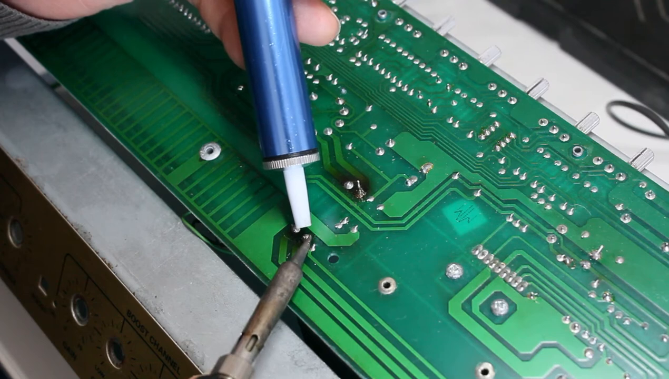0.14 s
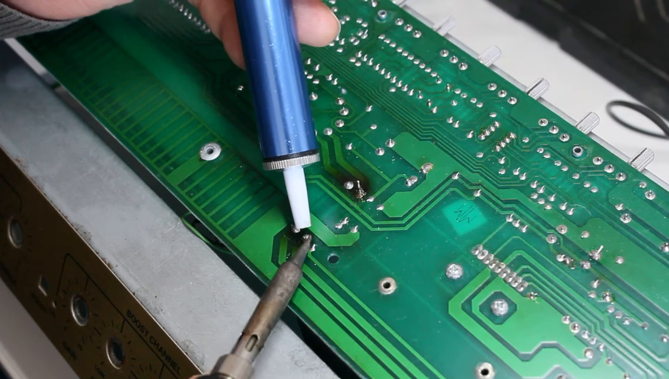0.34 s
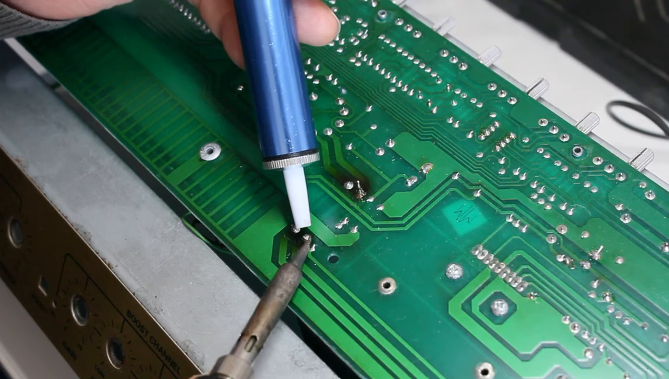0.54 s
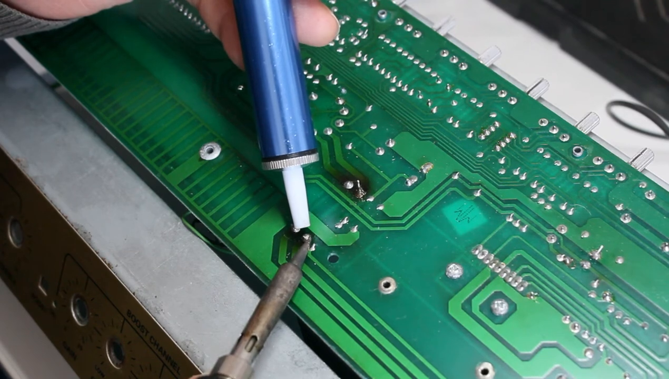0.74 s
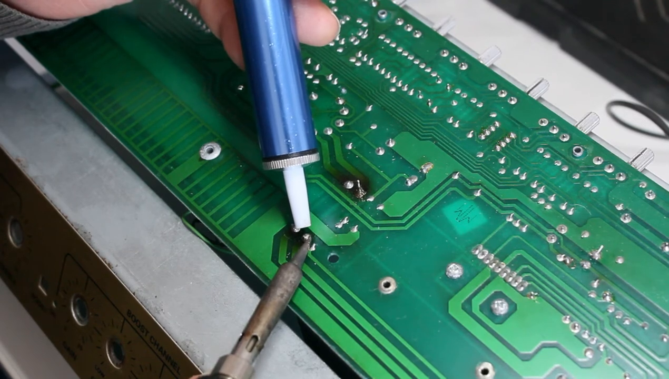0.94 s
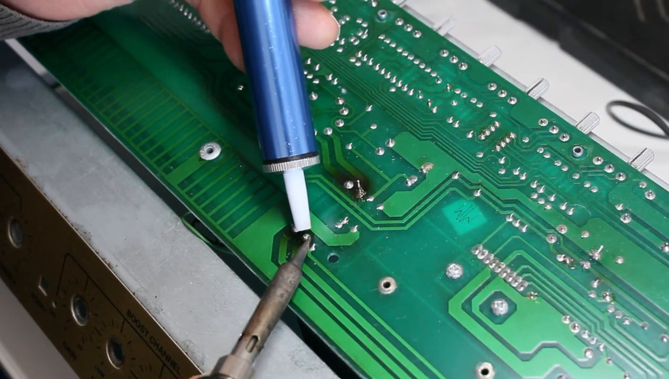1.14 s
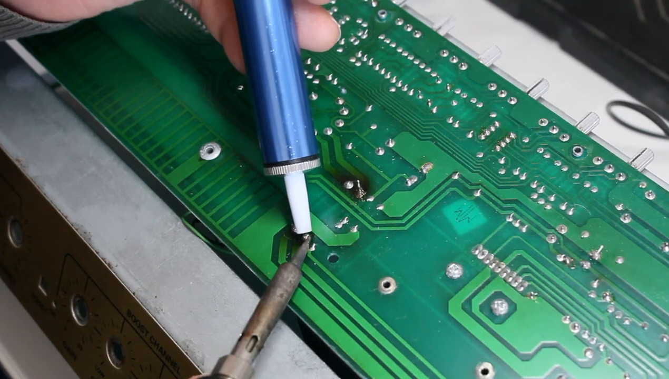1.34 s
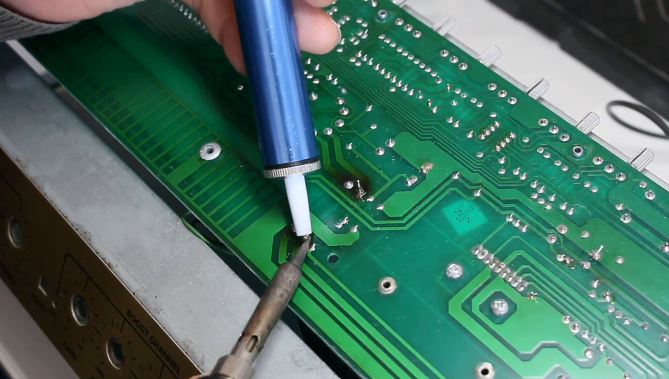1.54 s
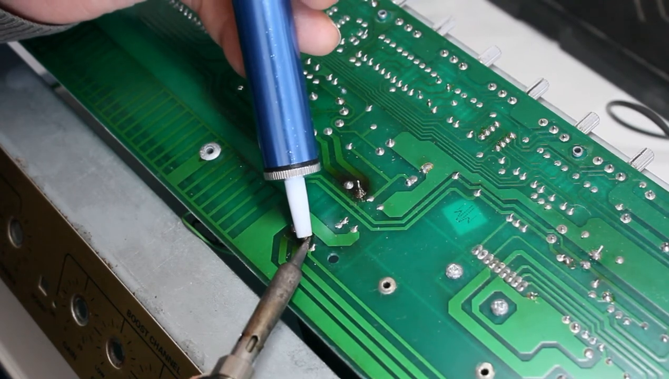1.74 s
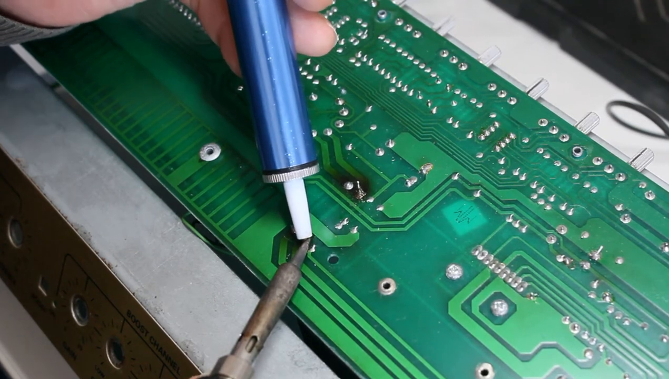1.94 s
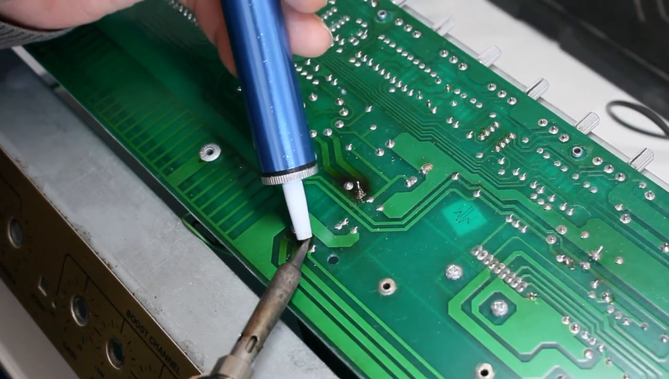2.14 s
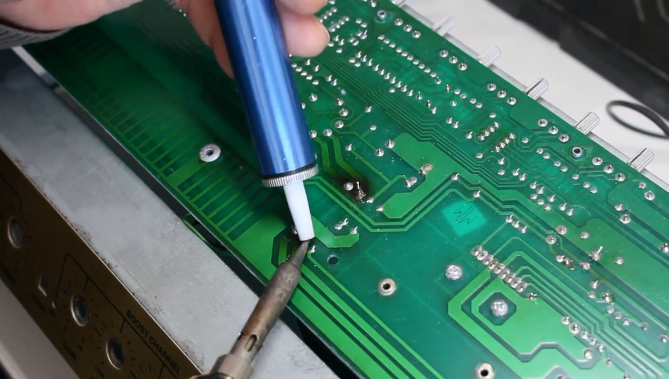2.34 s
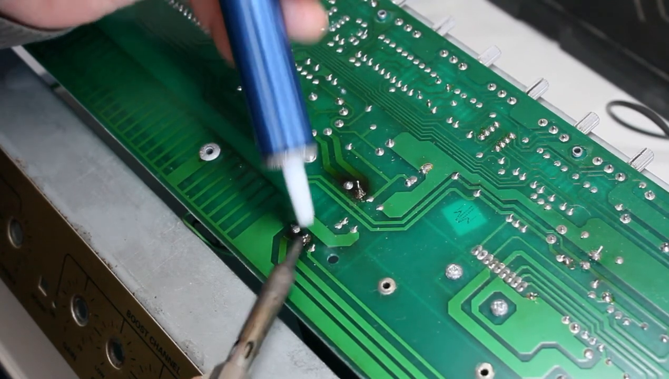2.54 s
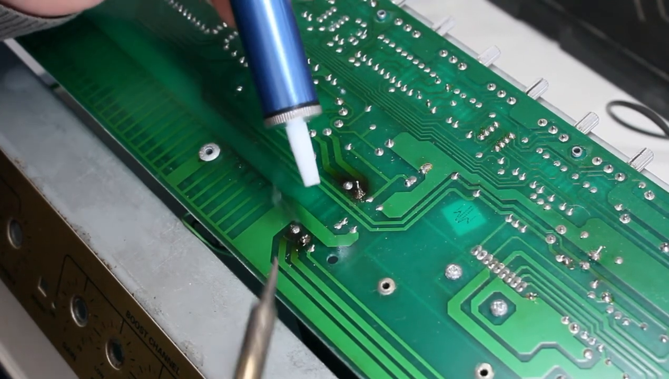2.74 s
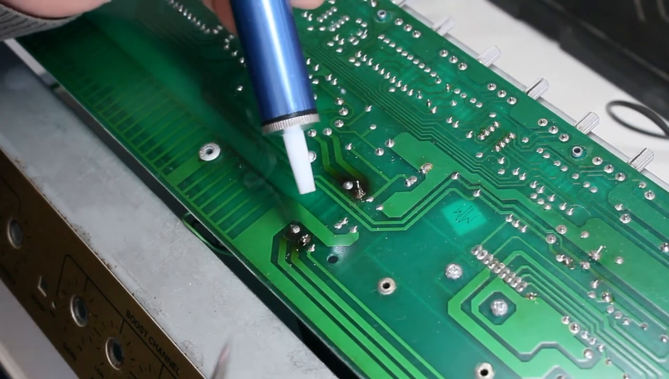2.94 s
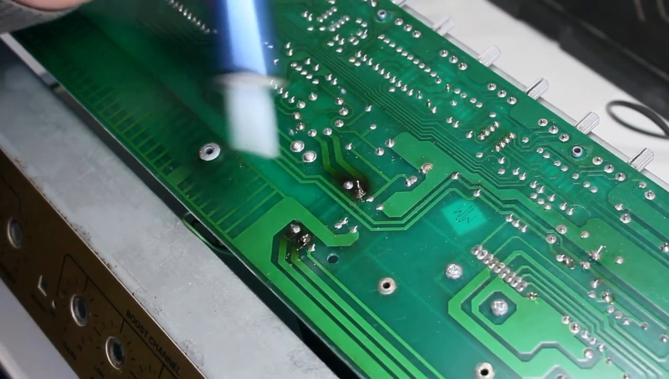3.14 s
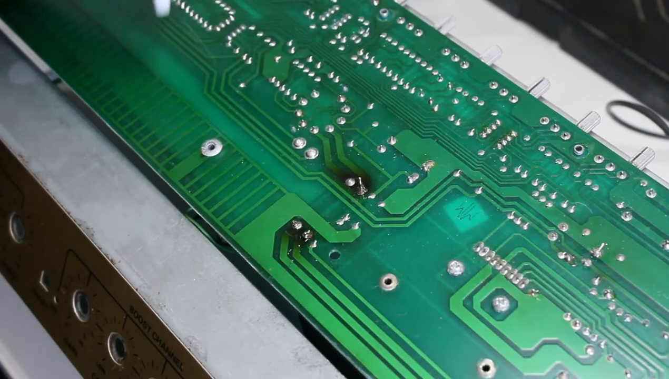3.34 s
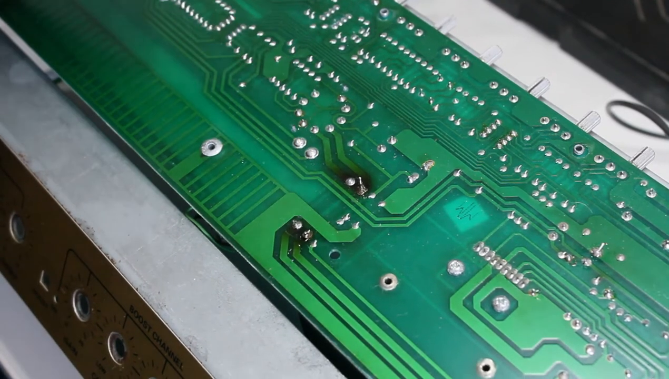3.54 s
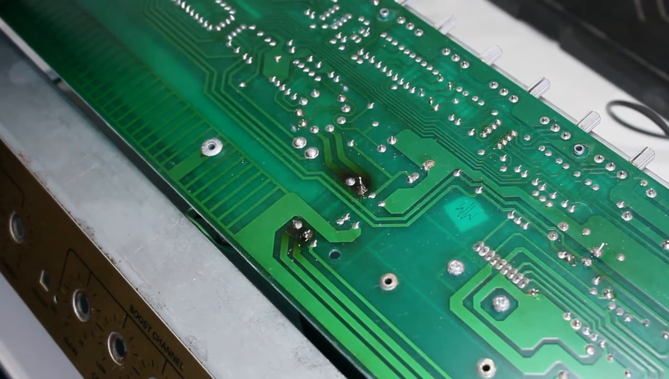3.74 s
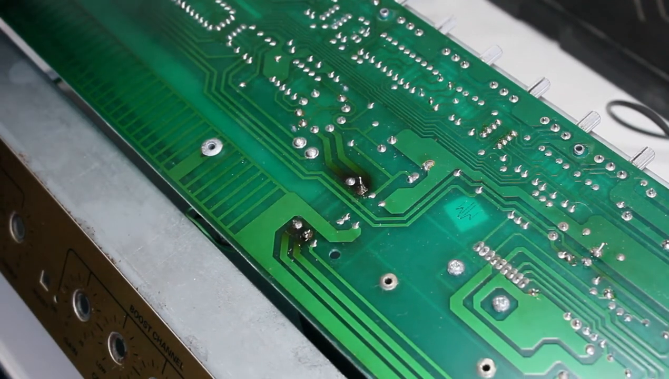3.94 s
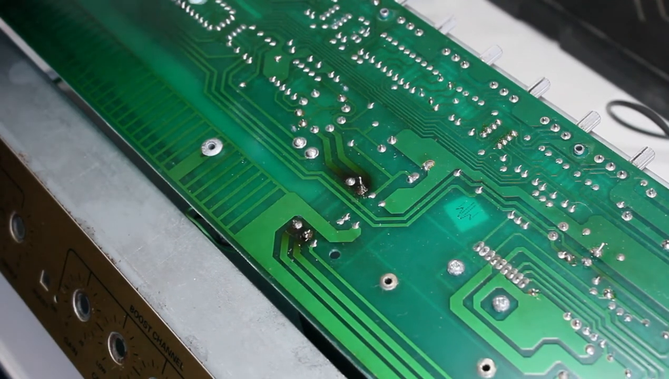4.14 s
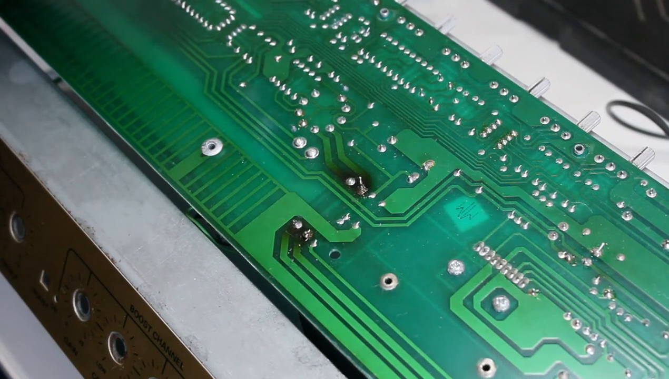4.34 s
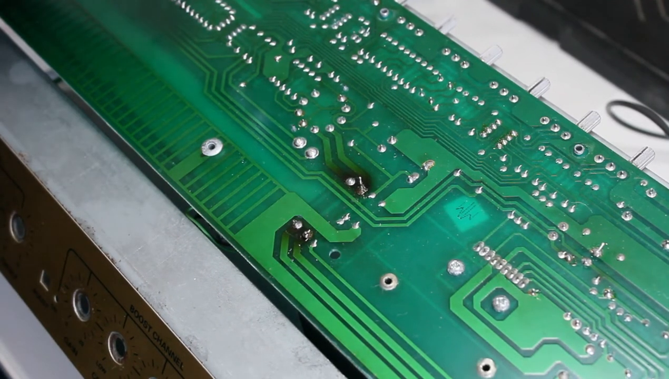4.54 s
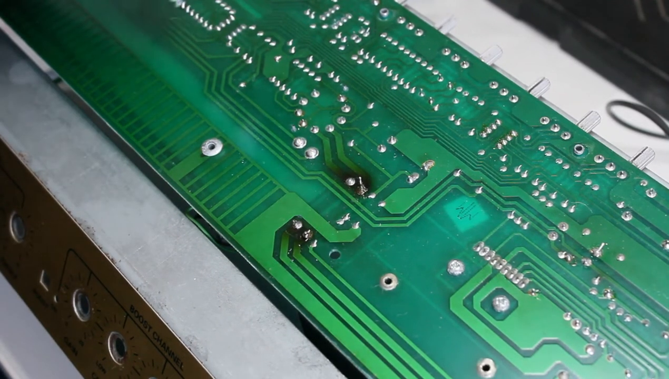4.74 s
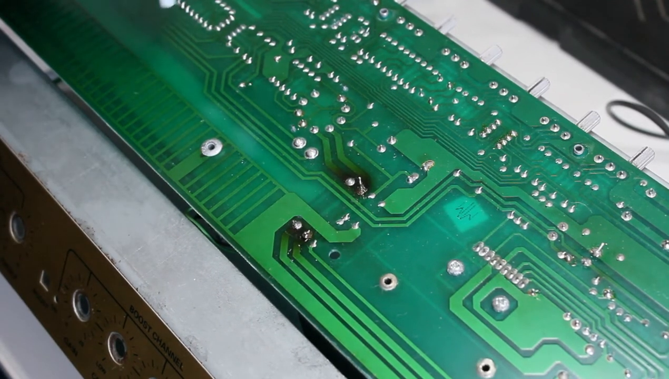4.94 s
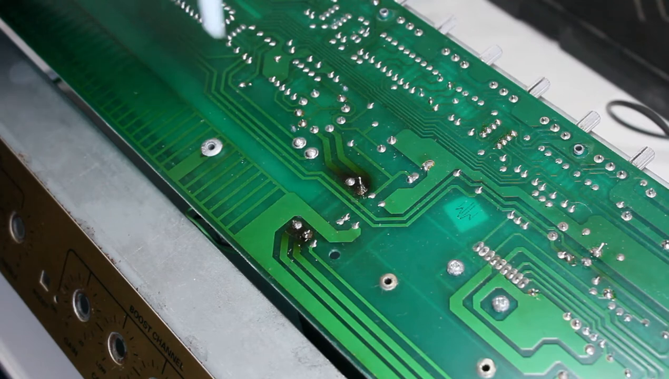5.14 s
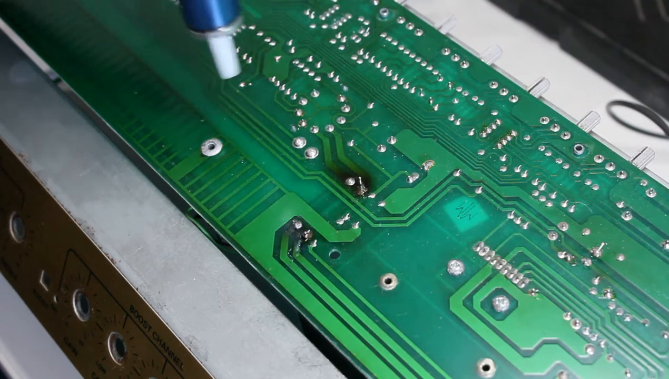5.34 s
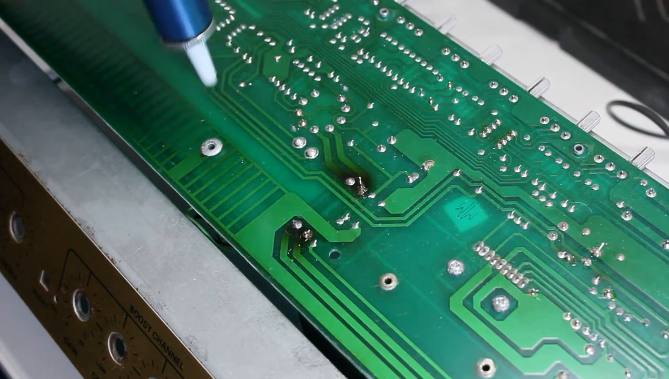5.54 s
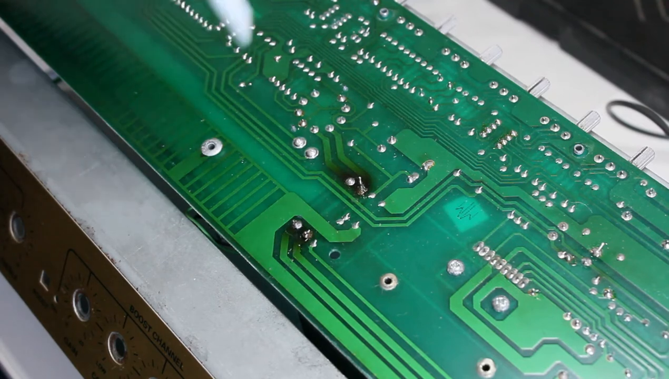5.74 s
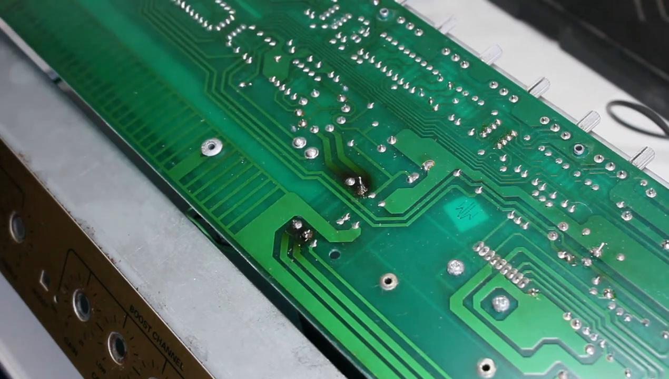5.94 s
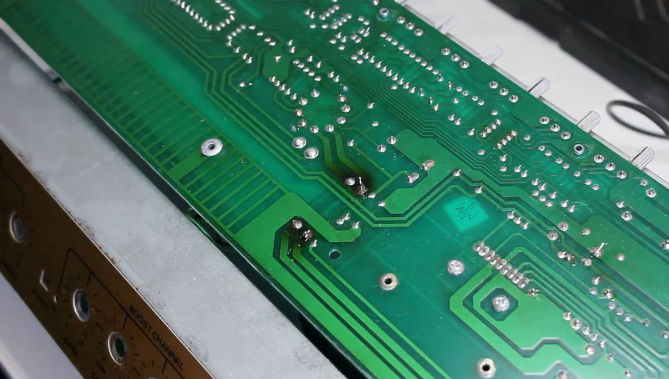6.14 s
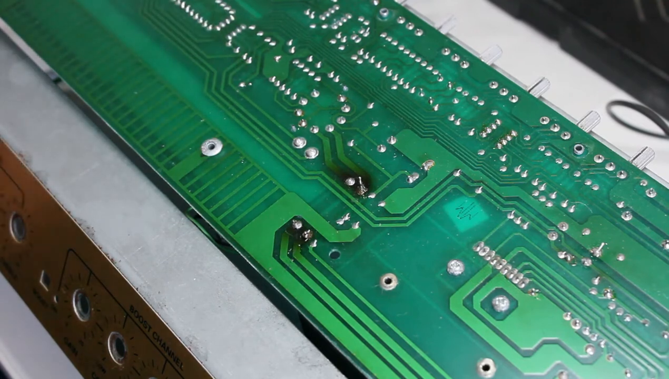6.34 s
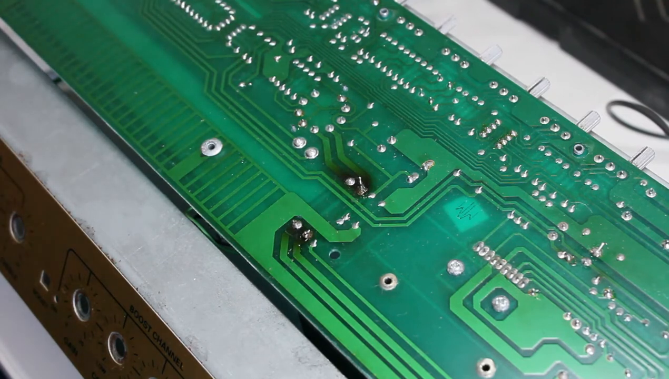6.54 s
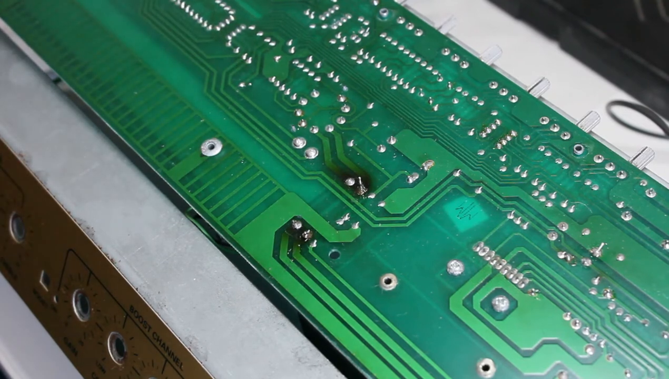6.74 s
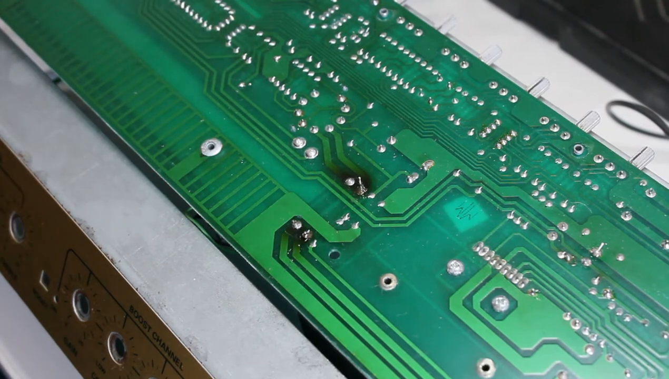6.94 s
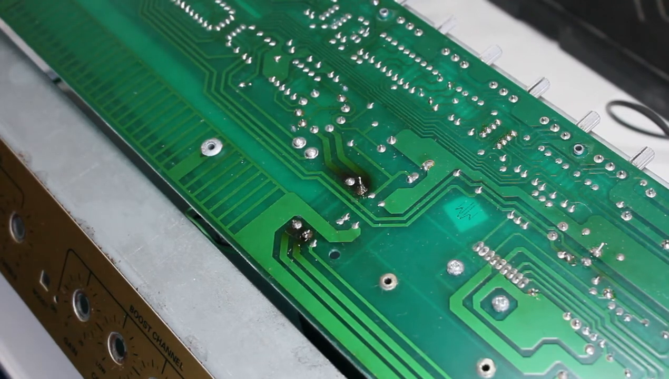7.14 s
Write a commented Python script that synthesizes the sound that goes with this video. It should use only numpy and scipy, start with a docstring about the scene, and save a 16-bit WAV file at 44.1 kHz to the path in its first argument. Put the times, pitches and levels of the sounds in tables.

```python
"""A spring-loaded desoldering pump fires at a circuit board, then its plunger is pushed home, latched and worked again.
The shot is a gulp of shaped noise and a piston slamming down a ringing barrel, built from noise cracks and decaying modes.
Tools tap the board, strokes rub, and the soldering iron is wiped with a noise hiss and knocks into its stand.
The place is a small workroom with faint hum and whines, heard through a close microphone with gain control."""
import sys
import numpy as np
from scipy import signal
from scipy.fft import rfft, irfft
from scipy.io import wavfile
from scipy.ndimage import uniform_filter1d

SR = 44100
rng = np.random.default_rng(int(sys.argv[2]) if len(sys.argv) > 2 else 0)


def file_out(sig):
    """Save sig as 16-bit WAV at sys.argv[1]."""
    # one column per channel
    cols = np.atleast_2d(sig).T
    # limit, then scale
    lim = np.clip(cols, -1, 1)
    pcm = np.round(lim * 32767).astype(np.int16)
    wavfile.write(sys.argv[1], SR, pcm)


N = 321048  # length in samples
T = np.arange(N) / SR  # time in seconds


def from_db(db):
    """Decibels to an amplitude factor."""
    return 10 ** (np.asarray(db) / 20)


def rms_one(x):
    """Scale to an rms of 1."""
    return x / np.sqrt(np.mean(x ** 2) + 1e-20)


def unit_energy(x):
    """Scale so that the squared samples sum to 1."""
    return x / np.sqrt(np.sum(x ** 2) + 1e-20)


def level(start, attack, hold, release):
    """Gain over time: a straight rise to 1, a hold and a straight fall; all arguments in seconds."""
    corners = start + np.cumsum([0, attack, hold, release])
    return np.interp(T, corners, [0, 1, 1, 0])


def band(x, low_hz, high_hz, order=3):
    """Keep only one band of frequencies."""
    top_hz = min(max(high_hz, low_hz * 1.1), SR * .45)
    return signal.sosfilt(signal.butter(order, [low_hz, top_hz], "band", fs=SR, output="sos"), x)


def coloured(spectrum):
    """Noise with a smooth (freq_hz, level_db) spectrum; rms 1."""
    hz, db = np.transpose(spectrum)
    bins_hz = np.maximum(np.arange(N // 2 + 1) * SR / N, 1)
    gain = from_db(np.interp(np.log(bins_hz), np.log(hz), db))
    return rms_one(irfft(rfft(rng.standard_normal(N)) * gain, N))


def dying(t, t60):
    """Exponential decay that falls 60 dB in t60 seconds."""
    return np.exp(-np.log(1000) * t / t60)


def add(out, s, sound):
    """Mix a sound in from time s."""
    at = int(s * SR)
    out[at:at + len(sound)] += sound[:N - at]


SNAP_HZ = (5800, 10500)  # low and high edge of a blow's bright part
THUD_REF_HZ, THUD_DB_PER_OCTAVE = 3210, 10.5  # blows pitched below this carry more thud, above it less


def blows(rows, modes, ring_db, thud_db, thud_hz, width, contact_ms, scatter_db=1.0):
    """Each blow is a brief noisy contact with thud, pitched knock and snap; the body's modes ring after it."""
    out, t = np.zeros(N), T[:SR // 3]
    contact = np.exp(-(t[:SR // 25] * 1000 / contact_ms) ** 1.5)
    for s, db, pitch_hz, snap_db in rows:
        bands_hz = np.array([thud_hz, (pitch_hz / width, pitch_hz * width), SNAP_HZ])
        pitch_thud_db = THUD_DB_PER_OCTAVE * np.log2(THUD_REF_HZ / pitch_hz)
        bands_db = db + np.array([thud_db + pitch_thud_db, 0, snap_db])
        for (low, high), band_db in zip(bands_hz, bands_db):
            crack = unit_energy(band(rng.standard_normal(len(contact)) * contact, low, high, order=2))
            add(out, s, crack * from_db(band_db) * np.sqrt(SR / 200))  # levels are rms over 5 ms
        # each mode is driven by the blow's strength near its own frequency
        centres = np.log(bands_hz).mean(axis=1)
        for hz, mode_db, t60 in modes:
            drive_db = np.interp(np.log(hz), centres, bands_db) + ring_db + scatter_db * rng.standard_normal()
            add(out, s, from_db(drive_db + mode_db) * dying(t, t60) * np.cos(2 * np.pi * hz * t))
    return out


# room and microphone noise spectrum: freq_hz, level_db
HUSH_SPECTRUM = [(15, -54.5), (25, -8.5), (141, -4), (344, -6), (677, -8.5), (3920, -16), (5430, -19),
                 (6740, -22.5), (7310, -19.5), (12900, -33), (16000, -51)]
HUSH_DB = -54
# faint hum and thin whines: centre_hz, width_hz, level_db
WHINE_BANDS = [(145, 25, -68.5), (5200, 120, -72.5), (7424, 200, -78), (12790, 147.6, -83.5)]


def hush():
    """Steady room noise and hiss, with narrow bands of noise for the hum and whines."""
    out = from_db(HUSH_DB) * coloured(HUSH_SPECTRUM)
    for hz, width_hz, db in WHINE_BANDS:
        whine = band(rng.standard_normal(N), hz - width_hz / 2, hz + width_hz / 2, order=1)
        out += from_db(db) * rms_one(whine)
    return out


# tool tips touching the board: start_s, level_db, pitch_hz, snap_db (relative to level_db)
TOOL_TAPS = [(0.581, -48.5, 1110, -21), (0.5958, -32.5, 1900, -41), (1.2573, -43, 1795, -3.5),
             (2.578, -39, 2170, -22), (2.5924, -35, 2880, -12), (2.7879, -50, 1500, -29),
             (5.7145, -56, 900, -16), (6.7601, -45.5, 2367, -18)]
# what the circuit board rings with: freq_hz, level_db, t60_s
BOARD_MODES = [(430, -13, .22), (505, -14, .17), (1604, -12, .15)]


def board_taps():
    """Light contacts of a tool tip set the board's low modes ringing."""
    return blows(TOOL_TAPS, BOARD_MODES, ring_db=2.5, thud_db=-10.0, thud_hz=(400, 1150),
                 width=1.63, contact_ms=3.2)


def grains(per_s, spread_db):
    """Tiny slips of very uneven size, at random moments; rms 1."""
    sizes = from_db(spread_db * np.minimum(rng.exponential(1, N), 4))
    happens = rng.random(N) < per_s / SR
    return rms_one(happens * sizes * rng.standard_normal(N))


# plunger sliding, tools and fingers rubbing, hands on the bench: peak_s, length_s, level_db, centre_hz
RUB_STROKES = [(2.577, 0.044, -47, 1700), (2.9, 2.43, -55.5, 123.3), (3.4, 0.81, -53.5, 698),
               (3.427, 0.67, -58.5, 6000), (3.95, 0.037, -42, 12000), (4.2, 0.65, -51.5, 2220),
               (4.3125, 0.012, -24.5, 9900), (4.573, .15, -39.5, 5750), (4.69, 0.22, -37.5, 3400),
               (4.961, 0.026, -22, 3950), (4.975, 0.048, -35, 11000), (5.273, 0.074, -46, 2200),
               (5.884, 0.027, -49, 3500), (5.926, 0.074, -42.5, 1820), (7.245, 0.13, -47.5, 150)]
RUB_RISE_SHARE, RUB_WIDTH = 0.48, 1.76  # part of a stroke spent swelling; band edge over centre


def rubs():
    """Dry friction: dense slips that swell and fade with each stroke."""
    out, slips = np.zeros(N), grains(per_s=29000, spread_db=4.5)
    for peak, length, db, hz in RUB_STROKES:
        rise = length * RUB_RISE_SHARE
        stroke = level(peak - rise, rise, 0, length - rise)
        out += from_db(db) * stroke * rms_one(band(slips, hz / RUB_WIDTH, hz * RUB_WIDTH, order=1))
    return out


# clacks of catch and plunger: start_s, level_db, pitch_hz, snap_db (relative to level_db)
CATCH_CLACKS = [(2.2973, -36.5, 3530, -12.5), (3.2911, -50, 3460, 6.5), (3.6288, -29, 3400, -12.5),
                (3.6876, -35, 3000, 6.5), (3.6969, -11, 3580, -1.5), (3.7642, -30, 3400, -4.5),
                (3.8426, -38.5, 3530, -14), (4.1214, -27.5, 3800, -6.5), (4.168, -17, 3600, 1),
                (4.2327, -27.5, 2470, 4.5), (4.235, -24, 3300, 10.5), (4.3132, -19.5, 4250, -3.5),
                (4.482, -32, 3240, 2.5), (4.6746, -29.5, 2200, -6), (4.698, -17.5, 2920, -20.5),
                (4.7261, -9, 3100, -3.5), (4.9611, -14.5, 2820, -16.5), (4.9643, -25, 1420, -6),
                (5.0285, -56, 2700, 11.5), (5.8171, -49, 4620, 6)]
# what the plunger rings with: freq_hz, level_db, t60_s
PLUNGER_MODES = [(2735, -11, .22), (3480, -17, .17), (3900, -17, .18), (6560, -20, .13), (7950, -21, .14)]
# low thumps under two heavy clacks, as overloaded peaks give: start_s, peak_db
LOW_THUMPS = [(3.6971, -18), (4.9634, -19)]
THUMP_HZ = (90, 795)  # low and high edge
# the catch drops back once after each clack, never louder than the maximum
REBOUND_S, REBOUND_LOSS_DB, REBOUND_MAX_DB = .0157, 11.5, -37.5
# each clack shakes the coil around the clack's pitch, but no lower than the lowest; width is band edge over centre
BUZZ_DB, BUZZ_T60_S, BUZZ_WIDTH, COIL_LOWEST_HZ = -21, 0.27, 1.4, 2730
# the plunger judders near the end of its stroke, the slips growing unevenly; growth is dB per slip
JUDDER_START_S, JUDDER_PERIOD_S, JUDDER_SLIPS = 4.6258, .0098, 5
JUDDER_DB, JUDDER_GROWTH_DB, JUDDER_SCATTER_DB = -39, 0.4, 3
JUDDER_HZ, JUDDER_SNAP_DB = 2450, -7


def plunger():
    """Clacks, each with a small rebound and a buzz of the coil; a run of juddering slips; two low thumps."""
    rebounds = [(s + REBOUND_S, min(db - REBOUND_LOSS_DB, REBOUND_MAX_DB), hz, min(snap_db, 0))
                for s, db, hz, snap_db in CATCH_CLACKS]
    slips = []
    for k, uneven_db in enumerate(JUDDER_SCATTER_DB * rng.standard_normal(JUDDER_SLIPS)):
        slip_db = JUDDER_DB + k * JUDDER_GROWTH_DB + uneven_db
        slips.append((JUDDER_START_S + k * JUDDER_PERIOD_S, slip_db, JUDDER_HZ, JUDDER_SNAP_DB))
    out = blows(CATCH_CLACKS + rebounds + slips, PLUNGER_MODES, ring_db=-9.5, thud_db=-17.5,
                thud_hz=(620, 2000), width=1.244, contact_ms=1.5)
    t = T[:SR // 3]
    for s, db, hz, _ in CATCH_CLACKS:
        coil_hz = max(hz, COIL_LOWEST_HZ)
        buzz = rms_one(band(rng.standard_normal(len(t)), coil_hz / BUZZ_WIDTH, coil_hz * BUZZ_WIDTH, order=2))
        add(out, s, from_db(db + BUZZ_DB) * dying(t, BUZZ_T60_S) * buzz)
    thump = band(signal.unit_impulse(len(t)), *THUMP_HZ, order=2)
    for s, db in LOW_THUMPS:
        add(out, s, from_db(db) * thump / thump.max())
    return out


# air gulped through the nozzle: start_s, attack_s, hold_s, release_s
SUCTION_TIMES = (2.3062, .004, .022, .008)
SUCTION_DB = -15.5
# colour of the rushing air: freq_hz, level_db
GULP_SPECTRUM = [(25, -25.5), (150, -0.5), (400, 2), (800, 1), (1400, 1), (3000, -4), (5200, 5.5),
                 (8000, -8), (10500, 1.5), (13000, -7.5)]
PIPE_HZ, PIPE_DB, PIPE_T60_S = 800, -16.5, .04  # the swing of the air in the barrel


def suction():
    """Air rushes in while the piston flies; its first jerk sets the air in the barrel swinging."""
    air = from_db(SUCTION_DB) * level(*SUCTION_TIMES) * coloured(GULP_SPECTRUM)
    t = T[:SR // 10]
    swing = -from_db(PIPE_DB) * np.sin(2 * np.pi * PIPE_HZ * t) * dying(t, PIPE_T60_S)
    add(air, SUCTION_TIMES[0], swing)
    return air


# the piston slamming down the barrel: start_s, level_db, pitch_hz, snap_db (relative to level_db)
SLAM_BLOWS = [(2.3102, -20.5, 3400, 6), (2.3219, -12, 1900, -14.5), (2.3225, -14.5, 3200, 8),
              (2.3338, -14.5, 4500, -6.5)]
# what the metal barrel rings with: freq_hz, level_db, t60_s
BARREL_MODES = [(2380, -23, .3), (4640, -20, .2), (5136, -20, .17), (5240, -19, .17), (6589, -4, .085),
                (6690, -15, .16), (10120, -21, .13), (10255, -21, .13)]


def piston_slams():
    """The piston strikes in quick succession and the metal barrel rings."""
    return blows(SLAM_BLOWS, BARREL_MODES, ring_db=-0.5, thud_db=-11.0, thud_hz=(150, 1700),
                 width=1.35, contact_ms=1.4)


# the slack spring chatters after the shot and again as the pump lifts off: start_s, length_s, level_db
CHATTER_SPELLS = [(2.36, 0.13, -51), (2.576, 0.125, -50)]
CHATTER_FADE_DB_PER_S = 45


def spring(per_s=60, low_hz=3600, high_hz=9500, edge_s=0.017):
    """The slack spring chatters against the barrel: decaying noise ticks at a wandering rate."""
    wander_db = 5.3 * rms_one(band(rng.standard_normal(N), 10, 36, order=1))
    turns = np.cumsum(per_s * from_db(wander_db)) / SR
    ticks = np.exp(-(turns % 1) / 0.18) * rng.standard_normal(N)
    shaking = np.zeros(N)
    for s, length, db in CHATTER_SPELLS:
        fading_db = db - CHATTER_FADE_DB_PER_S * np.maximum(T - s, 0)
        shaking += level(s, edge_s, length, edge_s) * from_db(fading_db)
    return shaking * rms_one(band(ticks, low_hz, high_hz))


# the hot tip on a damp sponge: peak_s, rise_s, fall_s, level_db
SPONGE_WIPES = [(6.96, 0.27, 0.11, -43.5), (7.26, 0.16, .3, -50)]
# colour of the steam: freq_hz, level_db
SIZZLE_SPECTRUM = [(300, -9.5), (1000, -13), (2500, -2), (4000, -1.5), (7000, -5.5), (10500, -7),
                   (13000, -11.5), (16000, -13)]
# the iron bouncing into its stand: start_s, level_db
STAND_BOUNCES = [(6.961, -30.5), (6.9635, -27.5), (6.9707, -24)]
STAND_PITCH_HZ, STAND_SNAP_DB = 1720, -26
# what the stand rings with: freq_hz, level_db, t60_s
STAND_MODES = [(355, -5, .16), (600, -10, .18), (1100, -2, .09), (1184, 3, .24), (1725, -3, .17),
               (1809, -6, .15), (2925, -8, .18), (3260, -4, .06)]


def iron(swell_power=1.5):
    """Steam hisses from the tip as shaped noise, and the shaft bounces into its ringing stand."""
    steam = np.zeros(N)
    for peak, rise, fall, db in SPONGE_WIPES:
        steam += from_db(db) * level(peak - rise, rise, 0, fall) ** swell_power
    bounces = [(s, db, STAND_PITCH_HZ, STAND_SNAP_DB) for s, db in STAND_BOUNCES]
    knocks = blows(bounces, STAND_MODES, ring_db=-2.5, thud_db=-11.0, thud_hz=(330, 1150),
                   width=1.12, contact_ms=3.0)
    return steam * coloured(SIZZLE_SPECTRUM) + knocks


# the workroom's diffuse tail: freq_hz, level_db, t60_s
ROOM_TAIL = [(300, -10, 0.31), (1500, -16, 0.33), (4000, -14, 0.26), (8000, -12.5, .21), (14000, -15, .14)]


def room(x, early_db=-10.0, early_t60=0.036):
    """Quick reflections off bench and chassis, then a diffuse tail that dies sooner in the treble."""
    t, edges_hz = T[:SR // 2], np.geomspace(80, 18000, 9)
    hz, db, t60 = np.transpose(ROOM_TAIL)
    echo = np.zeros(len(t))
    for low, high in zip(edges_hz, edges_hz[1:]):
        log_centre = np.log(low * high) / 2
        decay = dying(t, np.interp(log_centre, np.log(hz), t60))
        tail = unit_energy(rng.standard_normal(len(t)) * decay * (t > .005))
        echo += from_db(np.interp(log_centre, np.log(hz), db)) * band(tail, low, high)
    early = unit_energy(rng.standard_normal(len(t)) * dying(t, early_t60) * (t > .0015))
    return signal.fftconvolve(x, echo + from_db(early_db) * early)[:N]


MIC_TOP_HZ = 11900  # treble roll-off of the close microphone
BENCH_ROOM_DB = 8.0  # board and iron excite the room more than the pump does


def scene():
    """Pump, board and iron sound in the room over its hush; the microphone softens their highest treble."""
    bench = board_taps() + iron()
    pump = rubs() + plunger() + suction() + piston_slams() + spring()
    wet = pump + room(pump) + bench + from_db(BENCH_ROOM_DB) * room(bench)
    softened = signal.sosfilt(signal.butter(4, MIC_TOP_HZ, fs=SR, output="sos"), wet)
    return (softened + hush())[None]  # one channel


def gain_control(x, threshold_db=-19.0, squeeze=0.96, release_db_per_s=32.5, attack_s=0.069):
    """Loud sounds push the gain down; it creeps back up."""
    power = uniform_filter1d(x[0] ** 2, size=441)  # over 10 ms
    loud_db = 10 * np.log10(np.maximum(power, 1e-12))
    cut_db = squeeze * np.maximum(loud_db - threshold_db, 0)
    # hold each peak of the cut and let it fall at the release rate
    release_db = release_db_per_s * T
    held_db = np.maximum.accumulate(cut_db + release_db) - release_db
    r = np.exp(-1 / (attack_s * SR))
    return x * from_db(-signal.lfilter([1 - r], [1, -r], held_db))


CUTOFF_HZ = 15800


def record(dry):
    """Gain control, hard clipping of peaks beyond full scale, and a steep cut of the top."""
    clipped = np.clip(gain_control(dry), -1, 1)
    return signal.sosfilt(signal.ellip(10, .1, 80, CUTOFF_HZ, fs=SR, output="sos"), clipped)


dry = scene()
out = record(dry)
file_out(out)
```